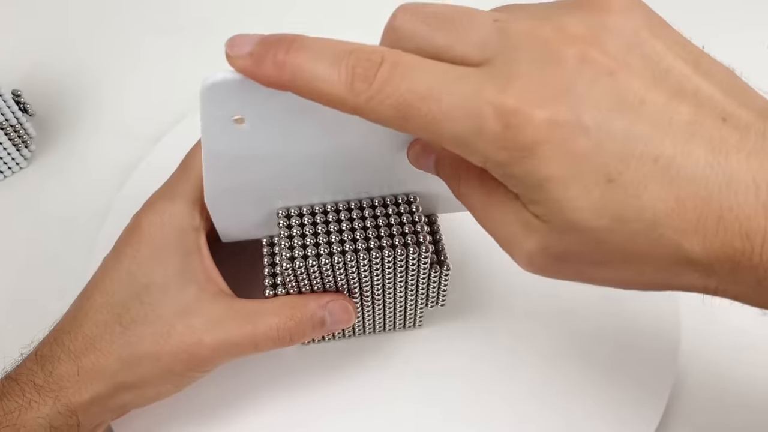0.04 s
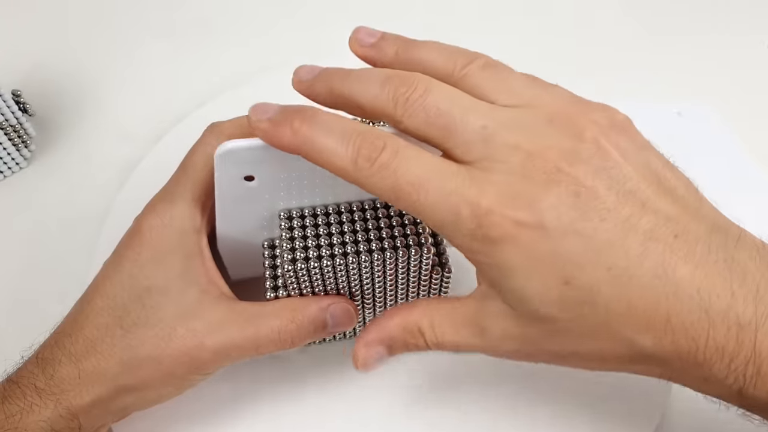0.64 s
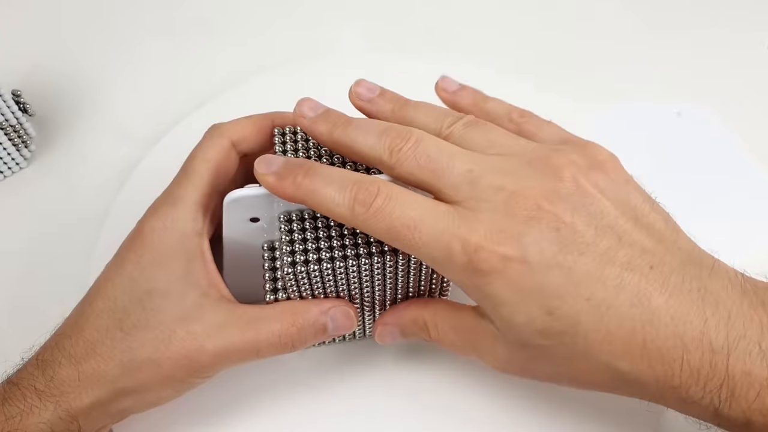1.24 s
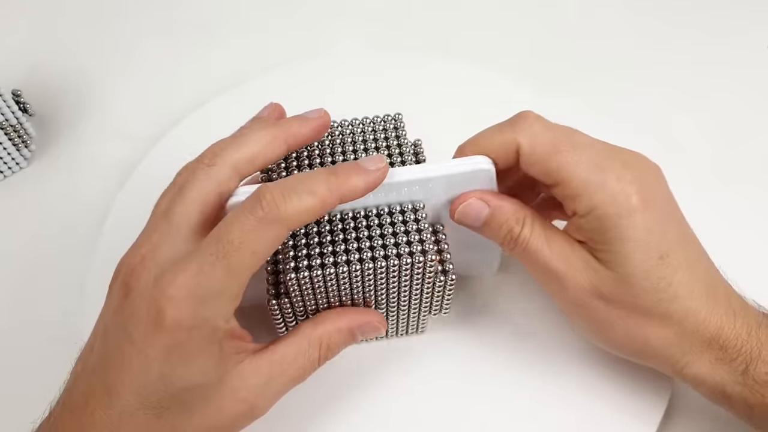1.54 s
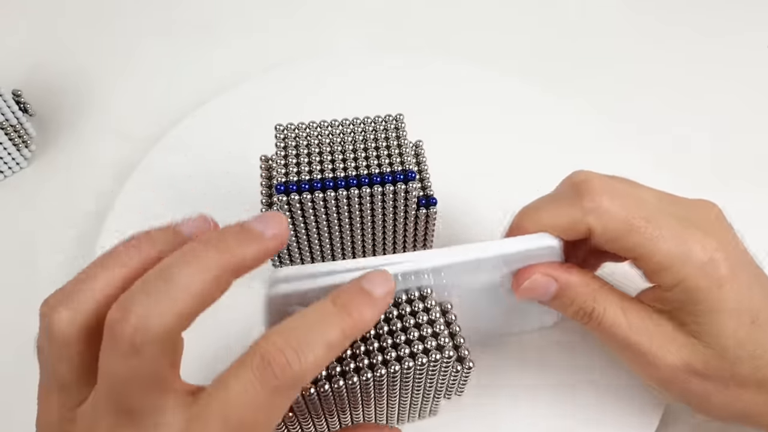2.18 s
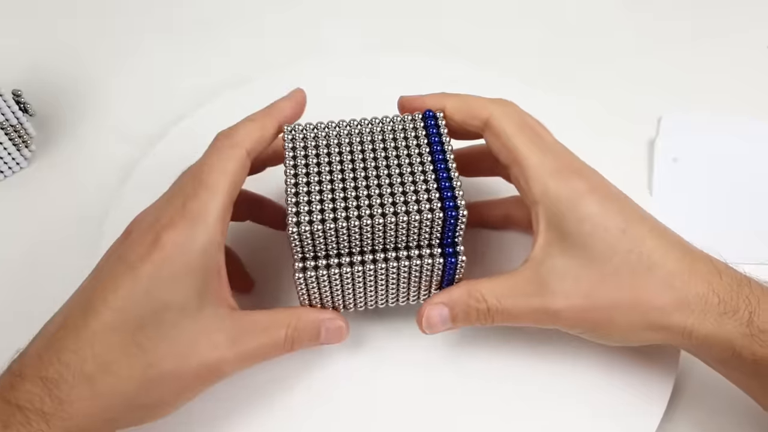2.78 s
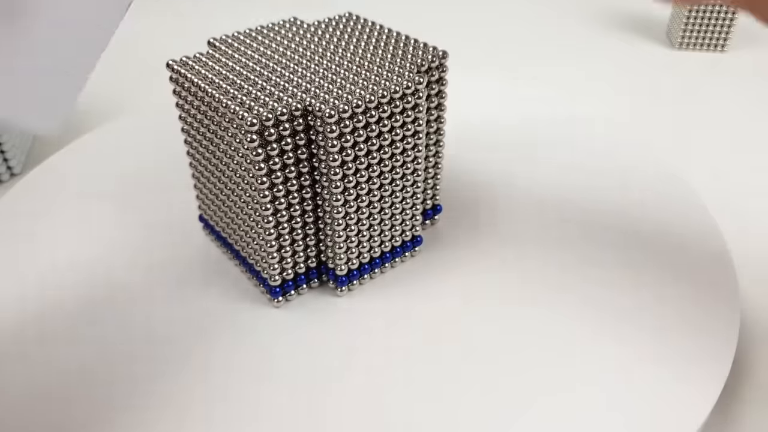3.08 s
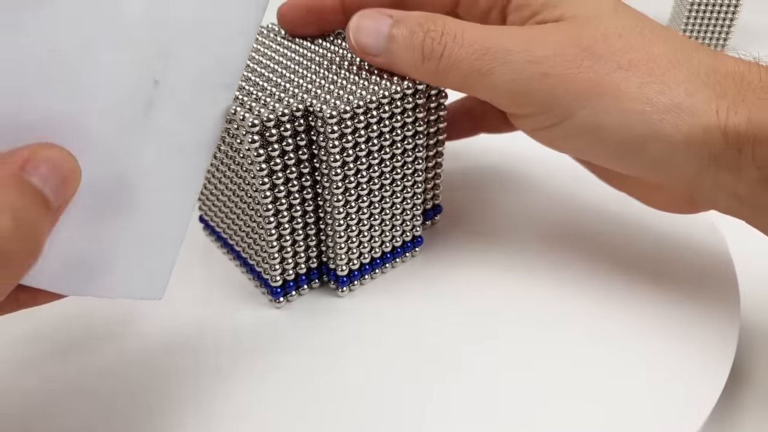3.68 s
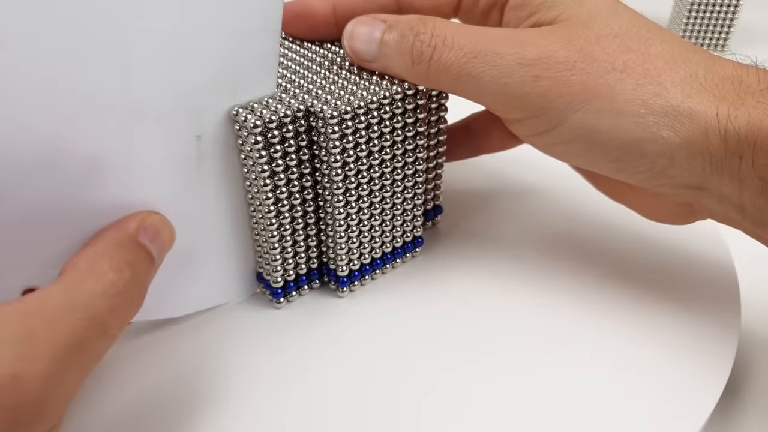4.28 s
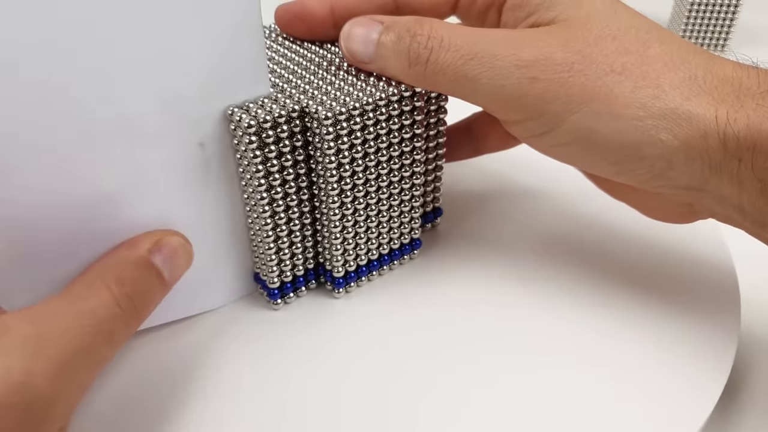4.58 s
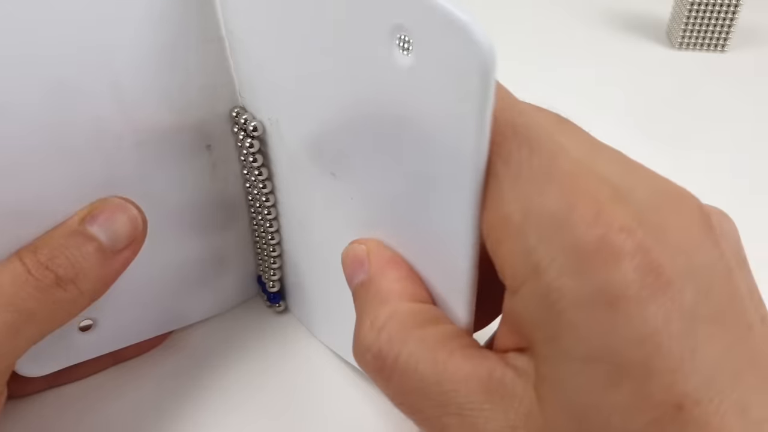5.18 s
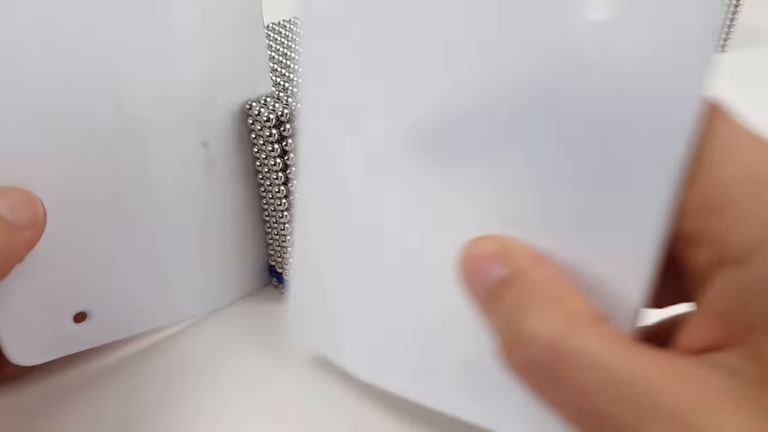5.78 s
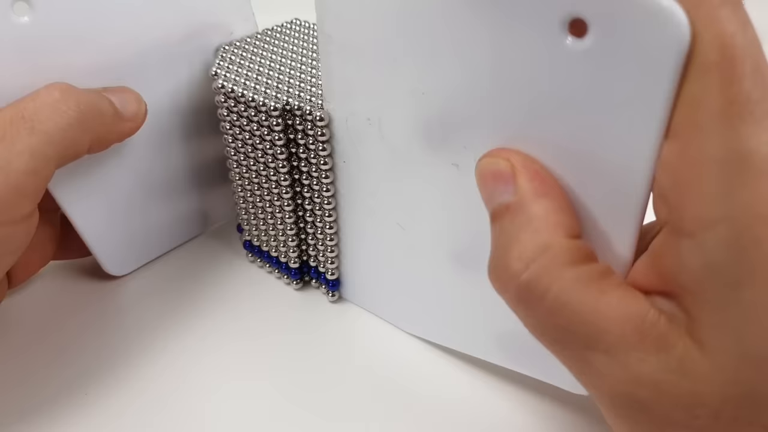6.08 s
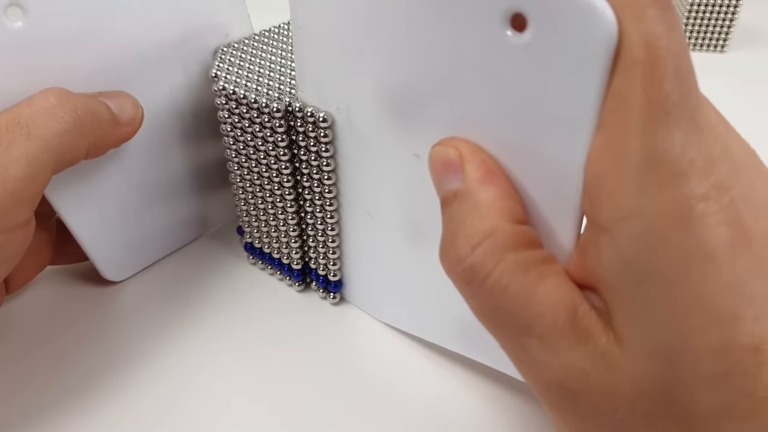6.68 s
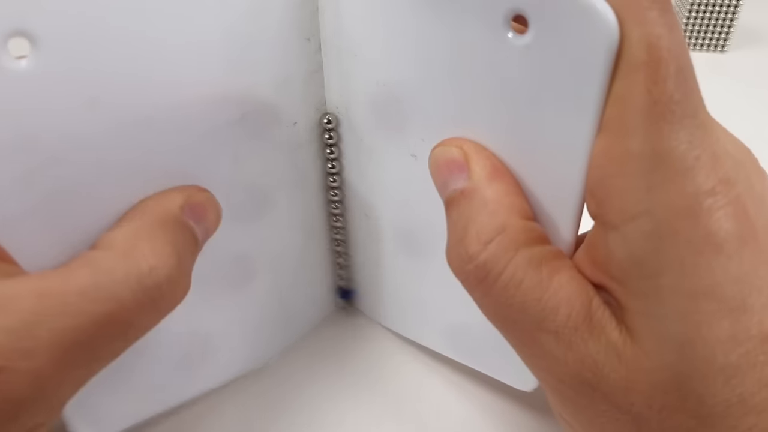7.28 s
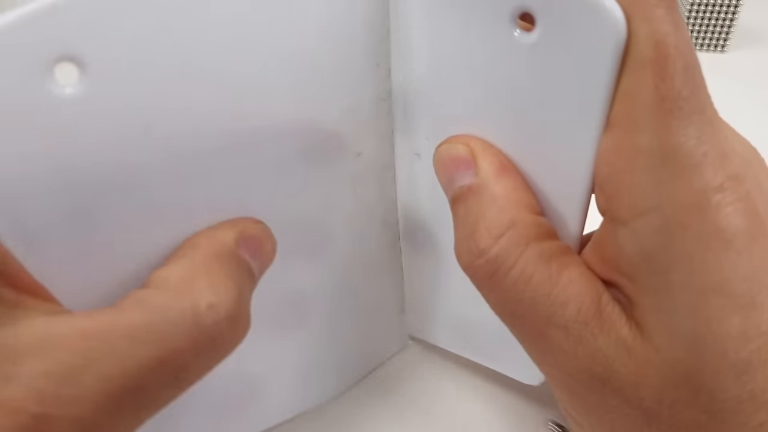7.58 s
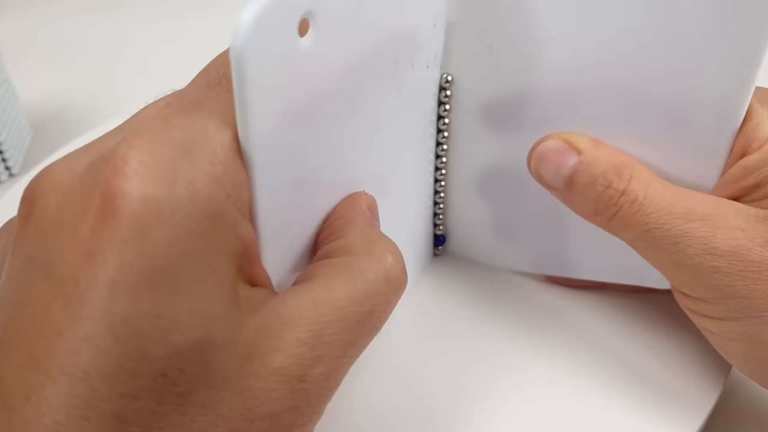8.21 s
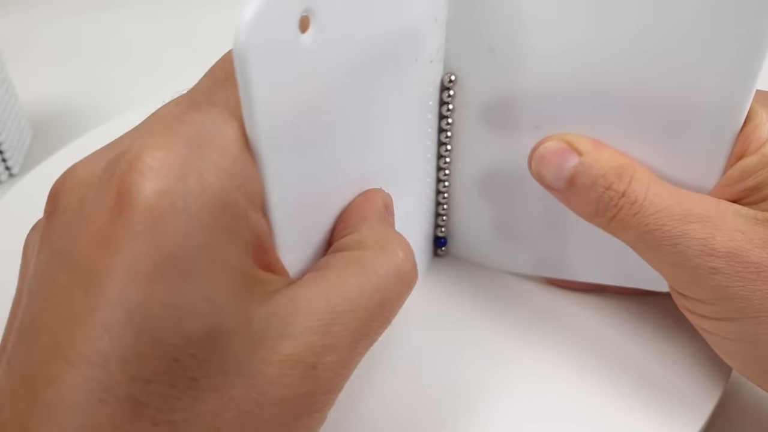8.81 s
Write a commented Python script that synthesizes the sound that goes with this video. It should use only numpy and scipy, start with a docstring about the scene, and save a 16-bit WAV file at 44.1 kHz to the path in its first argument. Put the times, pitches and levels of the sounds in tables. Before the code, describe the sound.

Close to the microphone in a bare room, little magnet balls crackle and clack as slabs pull shut, the heavier hits making the table boom faintly. A plastic card is dragged out with a gritty scrape. Softer knocks, rubs and clicks come as thin cards slice the block, and two strips drop in turn, clattering and ringing lightly before some last scattered snaps.

```python
"""Sharp, crackling snaps come first: close by, in a bare room, slabs of small magnet balls pull shut
on plastic cards and on each other. A card is dragged out between two slabs, dull knocks and brief rubs
follow, and strips sliced off the block fall and bounce to rest. Each impact is a cascade of tiny
collisions, filtered by the resonances of the bodies struck; friction gives noise and stick-slip pulses.
The table top booms in its low modes under the heavier blows, and the room reverberates."""
import sys
import numpy as np
from scipy import signal
from scipy.fft import rfft, irfft, next_fast_len
from scipy.io import wavfile
from scipy.ndimage import uniform_filter1d, map_coordinates

SR = 44100
rng = np.random.default_rng(int(sys.argv[2]) if len(sys.argv) > 2 else 0)


def transcribe(signal):
    """Save signal, clipped to [-1, 1], as a 16-bit WAV file at the path in sys.argv[1]."""
    frames = np.atleast_2d(signal).T
    limited = np.clip(frames, -1, 1)
    pcm = np.round(limited * 32767).astype(np.int16)
    wavfile.write(sys.argv[1], SR, pcm)


N = 390285
LEAD_S = .008  # the magnetic pull before each blow

# Levels in all tables are relative: each source adds its own gain.
# slabs snapping shut: t/s, cascade length/ms, level/dB, hardness/dB, thump on the table/dB
SNAPS = [(.1, 4.7, -36, -0.5, -33.5), (.125, 4.2, -39.5, 2.5, -32.5), (.138, 9.1, -35, -1.5, -45.5),
         (0.365, 4.1, -44, 3.5, -40), (.395, 3.87, -38, -1, -35), (.597, 2, -53.5, -7.5, -74),
         (.697, 3.1, -23.5, -1, -35), (0.7288, 3.25, -17.5, -1.5, -33.5), (0.7463, 3.26, -28, 1.5, -28),
         (.79, 1.54, -30.5, 0, -43.5), (.889, 3.4, -24, -5, -39.5), (.9028, 1.88, -12, -19.5, -42.5),
         (0.909, 1.41, -12, -17.5, -29.5), (1.912, 2.8, -46.5, -9, -57), (2.158, 3.3, -42.5, 0.5, -52.5),
         (2.58, 6, -34, 20.5, -36), (2.587, 6.74, -26, 18.5, -34), (3.996, 6.4, -44.5, 2.5, -73),
         (4.432, 9.7, -41, -7, -47), (4.451, 16.6, -47, 5, -37.5), (4.879, 4.6, -51.5, 4.5, -42),
         (4.909, 11.4, -37.5, -2.5, -42.5), (4.961, 9.4, -39.5, 4, -57), (5, 0.91, -59, 17.5, -74.5),
         (5.305, 0.94, -58, 5.5, -52.5), (5.374, 12.1, -48.5, 13, -58.5), (5.411, 11.6, -31.5, 0, -60),
         (5.4377, 1.5, -38.5, 11, -61.5), (5.47, 3.8, -26.5, 5.5, -57), (6.516, 1.5, -41, 3, -43.5),
         (6.727, 0.89, -52, -7, -51), (7.085, 1.63, -28.5, 1, -51), (7.336, 15.5, -30.5, 0.5, -57),
         (7.368, 1.77, -19, -16, -42), (7.423, 0.87, -36.5, 1, -64), (7.44, 1, -37.5, 2, -64),
         (7.475, 16, -16, -4, -77), (7.4939, 1.3, -18, 2, -40), (7.933, 2.07, -34, -2, -51.5),
         (7.959, 15, -41, 5.5, -57), (8.055, 15, -44, 10, -58), (8.565, 17, -45, 2, -53),
         (8.5869, 1.91, -27.5, 4.5, -36), (8.816, 3, -49.5, -5.5, -82)]
# dull, low knocks; the one at 7.507 s trails a loud snap:
# t/s, contact length/ms, level/dB, hardness/dB, thump on the table/dB
KNOCKS = [(1.94, 3.67, -37.5, -4, -48.5), (2.988, 6.5, -49, 12, -49.5), (3.361, 1.36, -36.5, -6.5, -60.5),
          (3.576, 1.4, -47, -11.5, -55), (3.818, 3.16, -42, -1.5, -50), (4.218, 7.7, -60.5, -4, -51.5),
          (6.34, 5.1, -47, -3, -75.5), (7.172, 3.6, -35, -7.5, -40.5), (7.379, 5.8, -28, 3.5, -41.5),
          (7.507, 9.4, -28, 7, -49), (8.249, 1.8, -47.5, 14.5, -77)]
# moments at which the ringing of room and table top stops short: t/s
RING_STOPS = [1.335, 2.37, 2.897, 4.692, 6.125, 8.26]
# spectral envelope of balls snapping together: f/Hz, level/dB
SNAP_SPECTRUM = [(60, -20.5), (160, 0.5), (400, -6), (850, -1), (1200, 0.5), (2500, -4), (4000, -8.5),
                 (7300, -7), (8700, -17), (10200, -12), (12500, -9.5), (15500, -11.5)]
# resonances of the block with the thin cards: f/Hz, width/Hz, gain/dB
THIN_CARD_MODES = [(227, 84, 6.6), (416, 160, 22), (1120, 270, 13), (1636, 220, 4), (2135, 300, 2)]


def amp(db):
    """Amplitude ratio of a level in decibels."""
    return np.exp(np.asarray(db) * np.log(10) / 20)


def unit(x):
    """Normalisation to rms 1."""
    return x / np.sqrt(np.mean(x ** 2) + 1e-20)


def along(points, hz):
    """Interpolation of (f/Hz, value) points on a logarithmic frequency axis."""
    f, v = np.transpose(points)
    return np.interp(np.log(hz + 1), np.log(f + 1), v)


def resonances(modes, hz):
    """Resonance: each mode raises a bell-shaped peak in the gain/dB."""
    return sum(db / (1 + (2 * (hz - centre) / width) ** 2) for centre, width, db in modes)


def filtered(x, response):
    """Linear filtering: the spectrum of x times a frequency response."""
    n = x.shape[-1]
    m = next_fast_len(n + SR // 8)
    return irfft(rfft(x, m) * response(np.fft.rfftfreq(m, 1 / SR)), m)[..., :n]


def causal(gain):
    """Minimum phase: the response with this gain that rings only after the blow."""
    cepstrum = irfft(np.log(np.maximum(gain, 1e-9)))
    half = len(cepstrum) // 2
    return np.exp(rfft(cepstrum * np.r_[1, np.full(half - 1, 2), 1, np.zeros(half - 1)]))


def wobble(rate):
    """Random modulation: a smooth curve through rate knots a second."""
    return map_coordinates(rng.standard_normal(int(N * rate / SR) + 4), [np.arange(N) * rate / SR])


def swell(start, end, rise_s, fall_s, fade_db):
    """Exponential growth and decay round a plateau: fade_db down rise_s before it and fall_s after."""
    t = np.arange(N) / SR
    away = np.maximum(np.maximum((start - t) / rise_s, (t - end) / fall_s), 0)
    return amp(-fade_db * np.minimum(away, 10))


def add(track, s, sound):
    """Superposition of a sound on the track at time s."""
    part = track[..., max(round(s * SR), 0):][..., :sound.shape[-1]]
    part += sound[..., :part.shape[-1]]


def paired(x):
    """Spatial coherence: two independent signals become a left and a right that are alike in the bass."""
    coherence = [(100, 0.48), (300, 0.89), (700, 0.36), (1500, 0.37), (4000, -.05)]  # f/Hz, left-right correlation
    angle = lambda hz: np.arccos(np.clip(along(coherence, hz), -1, 1)) / 2
    mid, side = filtered(x, lambda hz: np.array([np.cos(angle(hz)), np.sin(angle(hz))]))
    return np.array([mid + side, mid - side])


def grit(catches, colour):
    """Random excitation: tiny contacts ring a body. Returns left, right and radiated sound at rms 1."""
    ticks = catches * rng.standard_normal((3, N))
    return unit(filtered(np.vstack([paired(ticks[:2]), ticks[2]]), colour))


def room_tone():
    """Ambient noise: a faint, nearly steady rumble and hiss."""
    spectrum = [(15, -32.5), (25, -8.5), (55, 3), (141, -1.5), (206, -13), (301, -10.5), (607, -28),
                (1040, -20.5), (1290, -34), (1650, -23), (4370, -32.5), (7310, -32), (8830, -40),
                (14400, -29.5), (16000, -34)]  # f/Hz, spectral density/dB
    noise = filtered(paired(rng.standard_normal((2, N))), lambda hz: amp(along(spectrum, hz)))
    return unit(noise) * amp(-65.0 + 1.1 * wobble(2))


def reverberation(x):
    """Diffuse reflection: convolution with exponentially decaying noise, cut off at each ring stop."""
    decay_times = [(150, 0.8), (500, 0.54), (1200, 0.53), (3000, 0.55), (6500, 0.53), (9000, 0.62),
                   (15000, 0.26)]  # reverberation time: f/Hz, T60/s
    spectrum = [(100, -4.5), (500, -3.5), (1100, -2.5), (3000, -1.5), (7000, -4), (14000, 2)]  # colour of the reflections: f/Hz, gain/dB
    out = np.zeros((2, N))
    edges = [0, *(round(s * SR) for s in RING_STOPS), N]
    for a, b in zip(edges, edges[1:]):
        hz, t, noise = signal.stft(rng.standard_normal((2, SR)), SR, nperseg=256)
        decay = amp(-60 * t / along(decay_times, hz)[:, None])
        build_up = 1 - np.exp(-t / 0.0029)
        tail = signal.istft(noise * decay * build_up, SR, nperseg=256)[1]
        tail = filtered(paired(tail / np.linalg.norm(tail[0])), lambda hz: amp(along(spectrum, hz)))
        out[:, a:b] = signal.fftconvolve(x[None, a:b], tail, axes=1)[:, :b - a]
    return out


def table_boom():
    """Free vibration of a plate: each snap or knock sets the table top's damped low modes ringing."""
    modes = [(53.5, 2.5, 0.56), (69, -7, 0.57), (116.8, 1, 0.43), (138, -5, .3), (174.4, -5, 0.19)]  # f/Hz, level/dB, T60/s
    out = np.zeros(N)
    for s, *_, thump_db in [*SNAPS, *KNOCKS]:
        stop = min([b for b in RING_STOPS if b > s] + [s + .7])
        t = np.arange(int((stop - s) * SR)) / SR
        chance = rng.standard_normal((len(modes), 2))
        boom = sum(amp(db + 2.8 * louder - 60 * t / t60) * np.sin(2 * np.pi * hz * (1 + .037 * detune) * t)
                   for (hz, db, t60), (louder, detune) in zip(modes, chance))
        add(out, s, amp(thump_db - 1.6) * boom * (1 - np.exp(-t / 0.0034)))
    return out * amp([[1.1], [-1.1]])


def card_flexes():
    """Damped resonance: a thin card flexed against the block rings hollow in one blurred mode."""
    flexes = [(4.432, -48.5), (4.7, -63.5), (6.514, -46), (7.083, -41)]  # t/s, level/dB
    mode_hz, width_hz = 1107, 174
    strength = sum(amp(db) * swell(s, s, rise_s=0.012, fall_s=0.32, fade_db=61) for s, db in flexes)
    return strength * grit(1, lambda hz: 1 / (1 + (2 * (hz - mode_hz) / width_hz) ** 2))


def rub_envelopes():
    """Amplitude envelopes of rub and hiss: one long pull and several brief swells."""
    # the thick card is dragged out between two slabs: t/s, rub/dB, hiss/dB
    drag = [(1.6, -79, -96), (1.64, -56, -88), (1.736, -39, -50.5), (1.774, -29, -50.5), (1.878, -67, -93),
            (1.908, -50, -54), (1.948, -43.5, -60.5), (2.086, -35, -53.5), (2.208, -58.5, -62.5),
            (2.306, -50, -51.5), (2.36, -71, -61), (2.37, -73, -83)]
    # brief rubs and hisses; at 6.13 s a clatter's fading tail starts abruptly:
    # peak t/s, rise/s, fall/s, rub/dB, hiss/dB
    brief_swells = [(1.406, .02, .03, -62.5, -73.5), (1.517, 0.048, 0.055, -57, -68.5),
                    (2.56, 0.13, .03, -60.5, -93), (4.209, 0.16, 0.047, -63, -73.5),
                    (4.336, 0.032, .08, -64.5, -77), (4.42, 0.025, .03, -52, -67),
                    (4.7, 0.0084, 0.32, -70.5, -73), (4.826, 0.017, 0.11, -56, -65.5),
                    (6.13, 0.0088, 0.22, -57.5, -55), (6.966, 0.034, 0.11, -64, -77.5),
                    (8.254, 0.11, 0.0054, -79, -62.5)]
    s, *levels_db = np.transpose(drag)
    pull = amp([np.interp(np.arange(N) / SR, s, db, left=-np.inf, right=-np.inf) for db in levels_db])
    return pull + sum(amp([[rub_db], [hiss_db]]) * swell(peak, peak, rise_s, fall_s, fade_db=26)
                      for peak, rise_s, fall_s, rub_db, hiss_db in brief_swells)


def rub_and_hiss():
    """Sliding friction: the pulled card catches and rings the block; the same noise also swells briefly."""
    rub_spectrum = [(60, -32), (250, -3.5), (450, -7), (700, 1.5), (1150, -1.5), (1700, -10), (2600, -14.5),
                    (5000, -65.5), (16000, -71.5)]  # f/Hz, spectral density/dB
    hiss_spectrum = [(600, -25.5), (1800, 1), (2600, -4.5), (4200, -5.5), (6000, -7.5), (7500, -8),
                     (8800, -19.5), (13000, -14.5), (16000, -20.5)]  # f/Hz, spectral density/dB
    block_modes = [(279, 63, -1), (691, 62, 4), (1210, 600, 8), (1639, 220, -2)]  # the block with its card: f/Hz, width/Hz, gain/dB
    rubbing, hissing = rub_envelopes()
    catches = amp(1.8 * wobble(70) + 5.1 * wobble(900))
    rub = grit(catches, lambda hz: amp(along(rub_spectrum, hz) + resonances(block_modes, hz)))
    hiss = grit(catches, lambda hz: amp(along(hiss_spectrum, hz)))
    scrape = rub * rubbing * amp(-2.5) + hiss * hissing * amp(3.0)
    # comb filtering: an echo with a wandering delay makes the colour drift
    i = np.arange(N)
    earlier = i - SR * (.0018 + 0.00015 * wobble(12))
    return scrape + .5 * np.array([np.interp(earlier, i, channel) for channel in scrape])


def card_rasp():
    """Stick-slip oscillation: uneven pulses ring the card and give the end of the pull a rough pitch."""
    slipping = [(2.2, 440, -47), (2.246, 440, -53), (2.267, 513, -41), (2.295, 440, -48.5),
                (2.313, 490, -36.5), (2.331, 320, -62), (2.361, 370, -63)]  # t/s, slip rate/Hz, level/dB
    spectrum = [(200, -30), (450, 5), (1000, 5), (1400, 7), (2400, -0.5), (3200, 3), (4200, 0.5),
                (5500, -30), (16000, -42)]  # f/Hz, level/dB
    s, rate, level_db = np.transpose(slipping)
    t = np.arange(N) / SR
    cycles = np.cumsum(np.interp(t, s, rate) * (1 + 0.11 * wobble(300))) / SR
    slips = np.diff(np.floor(cycles), prepend=0) * amp(1.3 * wobble(440))
    # every slip scatters through card and balls for a few milliseconds
    scatter = rng.standard_normal((3, 512)) * amp(-60 * t[:512] / .012)
    rough = signal.oaconvolve(slips[None], scatter, axes=1)[:, :N]
    rasp = unit(filtered(rough, lambda hz: amp(along(spectrum, hz))))
    return rasp * amp(np.interp(t, s, level_db)) * (t > s[0]) * (t < s[-1])


def peels():
    """Shot noise: as a row unzips, ball after ball lets go with a tiny tick of random strength."""
    rows = [(0.105, 0.063, -47.5), (0.356, 0.035, -45), (4.897, 0.099, -44.5), (5.411, .17, -40),
            (7.348, 0.016, -34.5), (7.455, 0.027, -38.5)]  # t/s, duration/s, level/dB
    ticks_per_s = 1600
    releases = (rng.random(N) < ticks_per_s / SR) * amp(2.2 * rng.standard_normal(N))
    strength = sum(amp(db - 0.5) * swell(s, s + length, rise_s=0.014, fall_s=.05, fade_db=22)
                   for s, length, db in rows)
    colour = lambda hz: amp(along(SNAP_SPECTRUM, hz) + 0.63 * resonances(THIN_CARD_MODES, hz))
    return strength * grit(releases, colour)


def band_levels(level_db, hardness_db, offsets_db, slopes):
    """Contact stiffness: the harder the blow, the more treble. Levels of knock, clack, click, sizzle."""
    return level_db + np.array(offsets_db) + hardness_db * np.array(slopes)


def contact(length_ms, levels_db, colour, t60, scatter, lead_db, size=4096):
    """Impulse response to a cascade of colliding balls: left, right and what radiates into the room."""
    bands = [(160, 800), (800, 2600), (2600, 8200), (8200, 16000)]  # knock, clack, click and sizzle: lower f/Hz, upper f/Hz
    t, hz = np.arange(size) / SR, np.fft.rfftfreq(size, 1 / SR)
    # a few balls tick as they are pulled in, the first row strikes, the rest follow at random
    early = rng.random(12) ** 2 * LEAD_S
    late = rng.random(64) * length_ms / 1000
    sizes = np.r_[amp(lead_db - 20 * early / LEAD_S), np.full(len(late), .045 * length_ms)]
    sizes = sizes * rng.standard_normal(len(sizes)) * amp(5 * rng.standard_normal(len(sizes)) - 2)
    ticks = np.bincount(((LEAD_S + np.r_[-early, late]) * SR).astype(int), sizes, size)[:size]
    ticks[int(LEAD_S * SR)] += 1
    # cards, hands and table scatter each tick for some milliseconds
    paths = paired(rng.standard_normal((2, size)) * amp(-60 * t / t60))
    paths *= scatter / np.linalg.norm(paths[0])
    paths[0, 0] += 1  # the direct sound reaches the left first
    paths[1, 4] += .65
    paths[1, round(.00135 * SR)] += .45  # the right side hears a bounce off the card
    sound = rfft(ticks) * rfft(paths)
    strength = np.mean(np.abs(sound) ** 2, axis=0)
    # each band is brought to its level, as an rms over 10 ms
    gain, centres = colour(hz), np.sqrt(np.prod(bands, axis=1))
    for _ in range(3):
        power = strength * gain ** 2 * 2 / size / (SR / 100)
        lift_db = [db - 10 * np.log10(power[(hz > lo) & (hz < hi)].sum())
                   for db, (lo, hi) in zip(levels_db, bands)]
        gain = gain * amp(along(list(zip(centres, lift_db)), hz))
    # summed over all directions, the ripples of the single paths even out
    smoothed = np.sqrt(np.abs(uniform_filter1d(strength, size=60)))
    radiated = np.exp(1j * np.angle(rfft(ticks))) * smoothed
    return irfft(np.vstack([sound, radiated]) * causal(gain))[:, :size // 2]


def dull_knocks():
    """Damped transients: short, dull knocks with most of their energy at low frequencies."""
    spectrum = [(50, -13.5), (150, 0), (330, 4.5), (600, -14), (1200, -26), (2500, -29), (7000, -22.5),
                (9000, -37), (15500, -28)]  # f/Hz, level/dB
    offsets_db, slopes = [-0.5, -13.5, -15, -24.5], [0, .5, 1.1, 1.2]
    out = np.zeros((3, N))
    colour = lambda hz: amp(along(spectrum, hz))
    for s, length_ms, level_db, hardness_db, _ in KNOCKS:
        levels_db = band_levels(level_db, hardness_db, offsets_db, slopes)
        add(out, s - LEAD_S, contact(length_ms, levels_db, colour, t60=0.0381, scatter=1, lead_db=-41.5))
    return out * amp(-1.5)


def clatter_beats():
    """Periodic impacts: a strip lands row after row. Lists t/s, cascade/ms, level/dB, hardness/dB."""
    # start t/s, end t/s, cascade length/ms, level/dB, its slope/(dB/s), hardness/dB, its slope/(dB/s)
    clatters = [(5.597, 5.7, 8, -21.5, -45.5, 5, -47.5), (7.565, 7.668, 2.8, -29, 38, -11, 130)]
    period_s, spread_db = .016, 1
    return [(start + t, length_ms, db + growth * t - spread_db * rng.standard_normal(),
             hardness_db + hardening * t)
            for start, end, length_ms, db, growth, hardness_db, hardening in clatters
            for t in np.arange(0, end - start, period_s)]


def strip_ring():
    """Modal decay: a struck strip rings thinly, reaching each side with its own strength and phase."""
    modes = [(3550, -13, 0.5), (3973, -7.5, 0.86), (4820, 1.5, 0.47), (5320, -1.5, 0.59),
             (6008, -8.5, 0.52), (7080, -7.5, 0.29)]  # f/Hz, level/dB, T60/s
    t = np.arange(int(.6 * SR)) / SR
    chance = rng.standard_normal((len(modes), 2, 2, 1))
    bend = 1 + .003 * rng.standard_normal()  # bending detunes the strip
    return sum(amp(db + 1.8 * louder - 60 * t / t60) * np.sin(2 * np.pi * (hz * bend * t + phase))
               for (hz, db, t60), (louder, phase) in zip(modes, chance))


def strip_drops():
    """Inelastic collisions: loose strips fall on the table, bounce, clatter and ring."""
    landings = [(5.488, 3.1, -24.5, -8), (5.515, 3, -26.5, -5.5), (5.531, 5.1, -22.5, -1.5),
                (5.5544, 1.5, -25, -3), (5.566, 1.7, -30, 11), (5.584, 9, -19.5, 5.5), (5.631, 2, -24.5, 4),
                (5.763, 2.4, -39.5, 10), (7.507, 7.7, -25.5, 2.5), (7.529, 3.8, -23, -7),
                (7.675, 5, -22, -4.5), (7.697, 0.45, -22, 1.5), (7.7268, 0.34, -20, 2.5),
                (7.7555, 1.44, -22.5, 2.5)]  # t/s, cascade length/ms, level/dB, hardness/dB
    spectrum = [(60, -14.5), (250, -8.5), (700, -6.5), (1000, 2.5), (2200, 0), (3100, -0.5), (6500, 2),
                (8500, -9), (15500, -9)]  # f/Hz, level/dB
    modes = [(1085, 170, 9), (1500, 97, 3), (1948, 430, 7), (2770, 66, 2), (3395, 150, 9.2),
             (3840, 98, 3.8), (4537, 120, 9.3), (5040, 360, 5.8), (5920, 140, 6.3), (7000, 440, 3.9),
             (7240, 260, 6)]  # a strip on the table: f/Hz, width/Hz, gain/dB
    offsets_db, slopes = [-18.5, 0, -1, -23.5], [0.36, 0, 0.89, 1.75]
    ring_db = -24  # relative to the click band
    out = np.zeros((3, N))
    colour = lambda hz: amp(along(spectrum, hz) + resonances(modes, hz))
    for s, length_ms, level_db, hardness_db in [*landings, *clatter_beats()]:
        levels_db = band_levels(level_db, hardness_db, offsets_db, slopes)
        add(out, s - LEAD_S, contact(length_ms, levels_db, colour, t60=.027, scatter=1, lead_db=-27.5))
        add(out[:2], s, amp(levels_db[2] + ring_db) * strip_ring())
    return out * amp(-2.14)


def snaps():
    """Magnetic attraction: slabs slam against a card or each other; a heavy push adds to the knock."""
    # resonances of the bodies struck: f/Hz, width/Hz, gain/dB
    thick_card_modes = [(264, 120, 7.5), (680, 87, 10), (1100, 260, 15), (1620, 200, 6.5), (1720, 190, -3),
                        (2870, 260, -0.5)]
    bare_slab_modes = [(278, 90, -10.5), (606, 130, 9), (1097, 300, 4.5), (7335, 910, 2.5),
                       (9900, 2200, -3)]
    turned_modes = [(275, 140, 7), (436, 190, 17), (757, 220, 1), (1117, 360, 11), (1560, 89, 3),
                    (2100, 440, 7), (3700, 1400, 1.5)]  # the thin cards once the hands have changed over
    thick_out_s, thin_in_s, turn_s = 2.4, 2.95, 8.26
    offsets_db, slopes = [-0.5, -2, -7, -12], [0.079, 0, 0.86, 1.3]
    out = np.zeros((3, N))
    for s, length_ms, level_db, hardness_db, thump_db in SNAPS:
        modes = (thick_card_modes if s < thick_out_s else bare_slab_modes if s < thin_in_s
                 else THIN_CARD_MODES if s < turn_s else turned_modes)
        colour = lambda hz: amp(along(SNAP_SPECTRUM, hz) + resonances(modes, hz))
        levels_db = band_levels(level_db, hardness_db, offsets_db, slopes)
        levels_db[0] += .5 * (thump_db - level_db)  # the knock half follows the thump on the table
        add(out, s - LEAD_S, contact(length_ms, levels_db, colour, t60=0.062, scatter=0.89, lead_db=-13))
    return out * amp(-0.46)


def scene():
    """Superposition: direct sound, placed by level difference, plus the room and the table top."""
    hand_position = [(.1, 0.5), (0.999, 3), (2.2, 0), (2.55, -0.5), (3.3, 4), (4.5, 5.5), (5.45, 9),
                     (5.6, 2.5), (6.501, 7), (7.448, 3.5), (7.65, 3.5), (8.198, -0.5), (8.55, 4)]  # t/s, left minus right/dB
    diffraction_hz = 450  # below this the sound bends round the hands, wherever they work
    impacts = snaps() + strip_drops() + dull_knocks()
    sources = impacts + card_flexes() + rub_and_hiss() + peels() + card_rasp()
    direct, radiated = sources[:2], sources[2]
    lean = amp(np.interp(np.arange(N) / SR, *np.transpose(hand_position)) / 2 + 1.13)
    bass = filtered(direct, lambda hz: 1 / (1 + (hz / diffraction_hz) ** 4))
    near = (direct - bass) * np.array([lean, 1 / lean]) + bass.mean(axis=0) * amp([[1.5], [0]])
    return near + amp(-7) * reverberation(radiated) + table_boom() + room_tone()


def record(dry):
    """Band limiting: the microphone loses the deepest bass and the top treble; extreme peaks clip."""
    low_hz, top_hz = 34, 16000
    thinned = signal.sosfilt(signal.butter(2, low_hz, "highpass", fs=SR, output="sos"), dry)
    return np.clip(filtered(thinned, lambda hz: 1 / np.sqrt(1 + (hz / top_hz) ** 160)), -1.2, 1.2)


dry = scene()
out = record(dry)
transcribe(out)
```